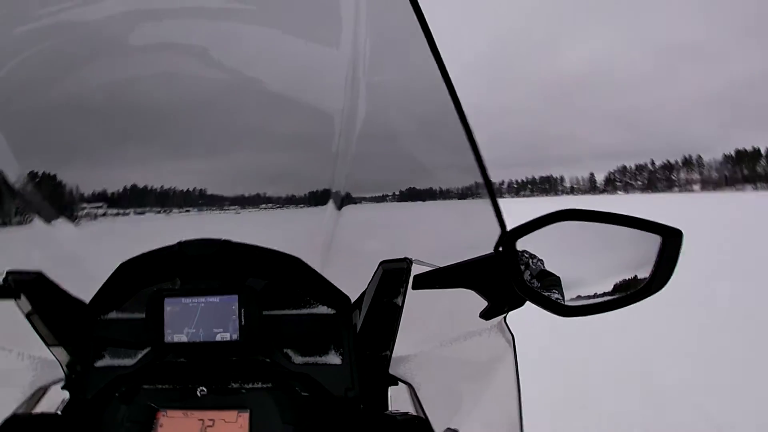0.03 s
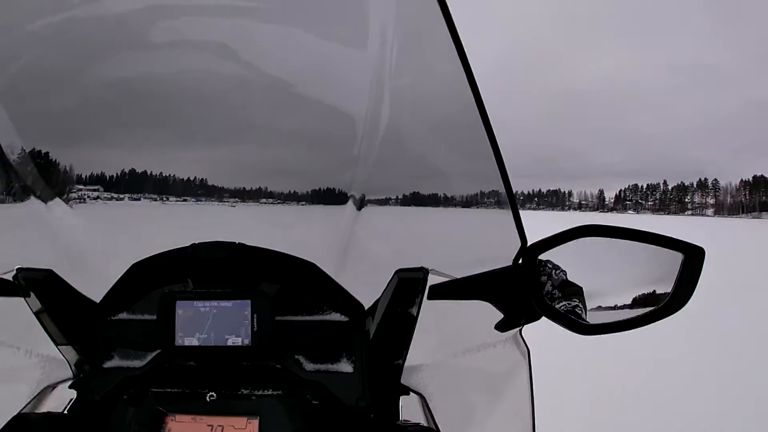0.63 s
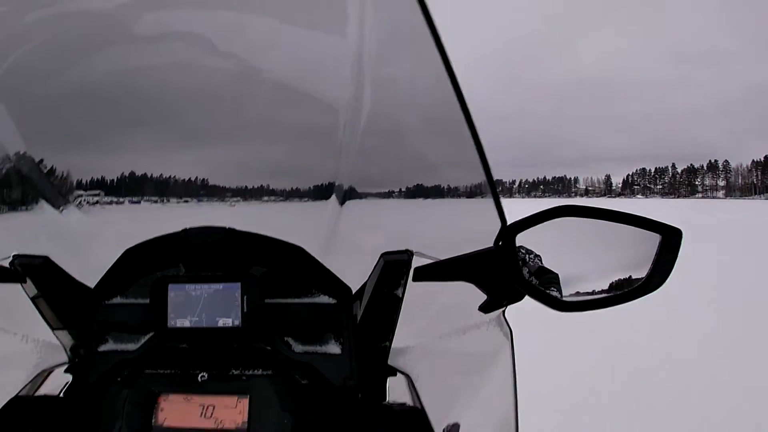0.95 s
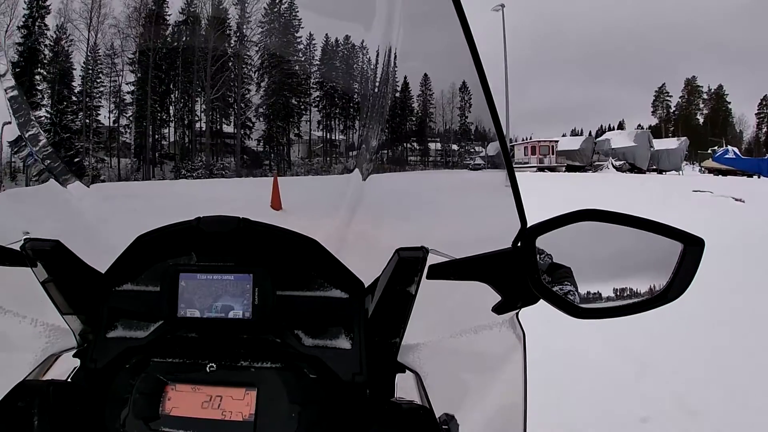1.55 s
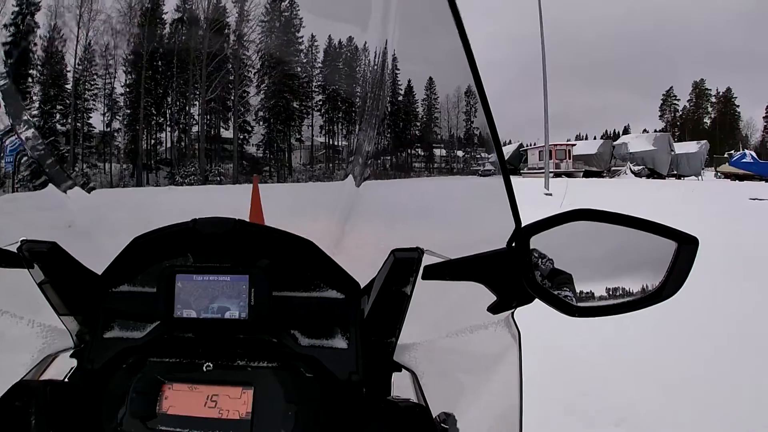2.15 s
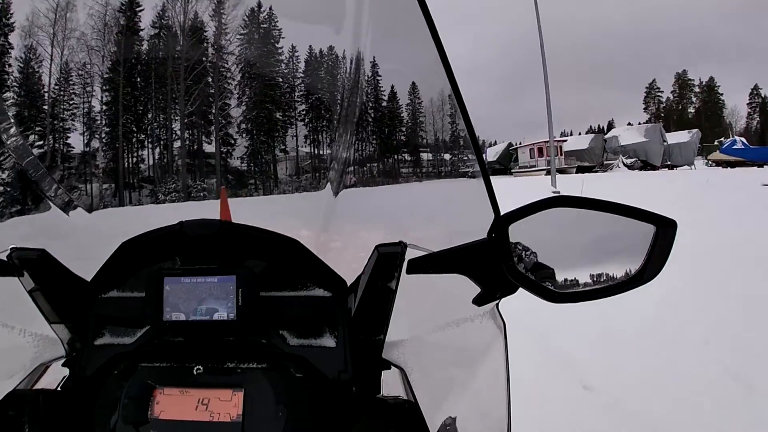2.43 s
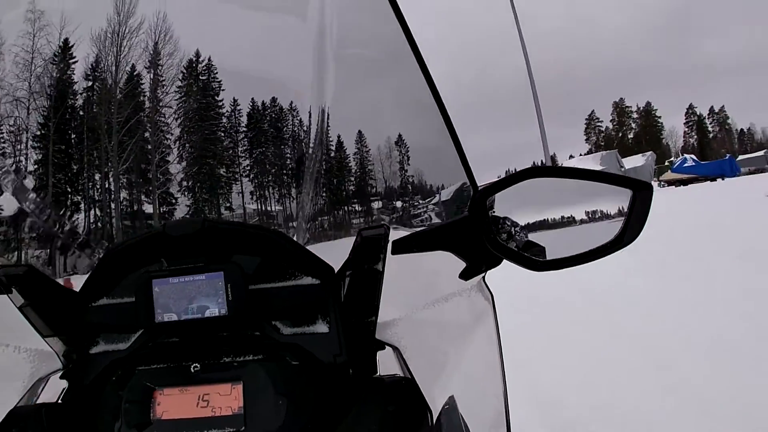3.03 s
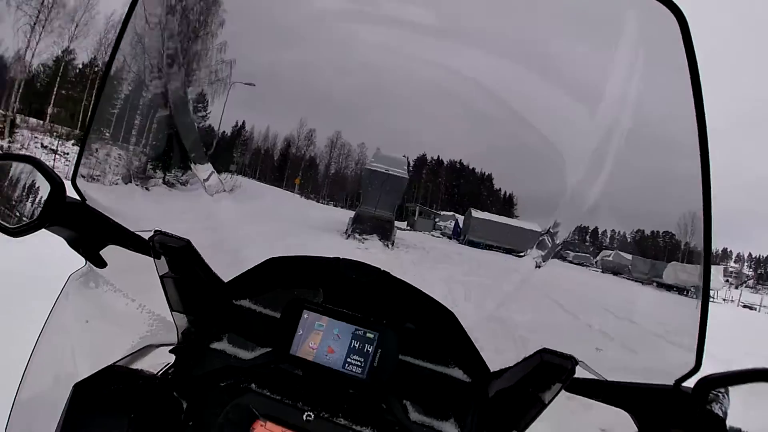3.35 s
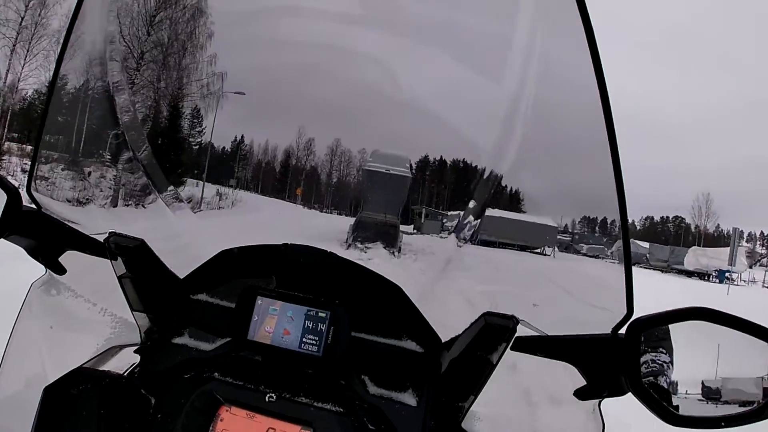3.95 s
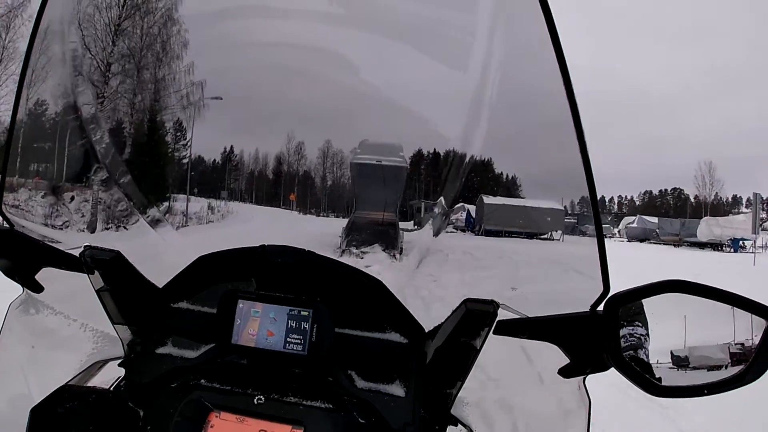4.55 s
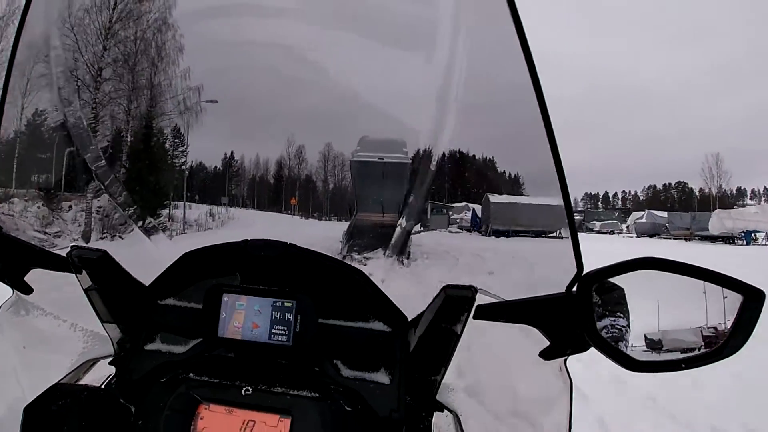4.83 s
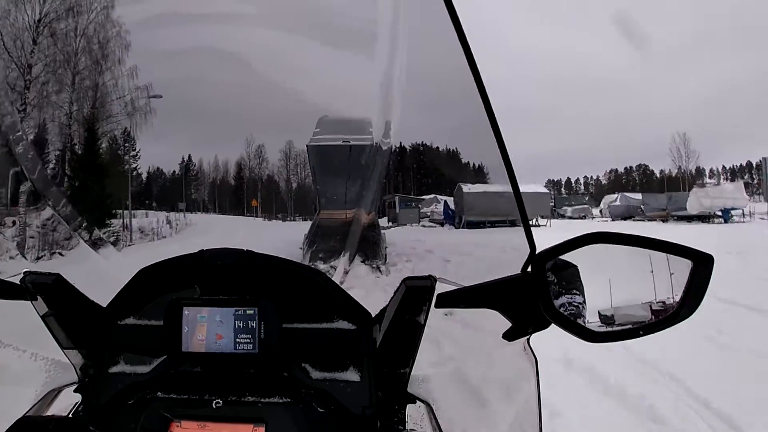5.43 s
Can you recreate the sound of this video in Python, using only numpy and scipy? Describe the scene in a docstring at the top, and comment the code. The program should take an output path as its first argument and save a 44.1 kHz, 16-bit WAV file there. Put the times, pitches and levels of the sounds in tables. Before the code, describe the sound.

Heard from the seat, a snowmobile cruises, accelerates from near idle and chugs slowly along, snow hissing and loose parts ticking.

```python
"""On a frozen lake, from the rider's seat of a four-stroke snowmobile, the microphone in a camera case.
Three rides are joined by hard cuts: cruising, pulling up from near idle, crawling towards the shore.
Close by, the exhaust throbs once per engine cycle, the machinery clatters, and in the second ride
the intake barks and the drive whines. From below, the track drones at cruising speed and snow
hisses and crunches under the skis. Loose parts tick and clink during the crawl."""
import sys
import numpy as np
from scipy import signal
from scipy.fft import rfft, irfft
from scipy.io import wavfile

SR = 44100
rng = np.random.default_rng(int(sys.argv[2]) if len(sys.argv) > 2 else 0)


def put_to_file(sound):
    """Save the sound as 16-bit audio at rate SR, in the file named by the first command-line argument."""
    columns = np.atleast_2d(sound).T  # one column per channel
    safe = np.clip(columns, -1, 1)
    whole_steps = np.round(safe * 32767)
    wavfile.write(sys.argv[1], SR, whole_steps.astype(np.int16))


N = 250927
TIME = np.arange(N) / SR
FREQS = np.maximum(np.fft.rfftfreq(N, 1 / SR), 1)

# Where the second and third rides begin, in seconds.
CUTS_S = [1.108, 3.27]
# Engine speed in each ride. Each row: time in seconds, engine cycles per second.
CRUISE_SPEED = [(0.0, 47.01), (1.11, 45.89)]
PULL_SPEED = [(1.11, 20.29), (1.45, 19.87), (1.95, 20.05), (2.23, 22.25), (2.6, 28.15), (2.83, 29.97),
              (3.27, 29.06)]
CRAWL_SPEED = [(3.27, 23.46), (3.7, 20.87), (3.97, 21.01), (4.31, 22.99), (4.83, 23.72), (5.25, 23.26),
               (5.69, 23.69)]
# Exhaust tones. Each row: multiple of the cycle rate, relative level in dB cruising, pulling, crawling.
EXHAUST_ORDERS = [(1, -34, -46.5, -32.5), (2, -35, -52, -27.5), (3, -40.5, -35, -35), (4, -24, -27, -18),
                  (5, -46, -31, -21.5), (6, -41.5, -41.5, -34.5), (7, -48, -38, -26), (8, -56, -38, -31.5),
                  (9, -62, -48, -40), (10, -63, -51.5, -43), (11, -60, -62, -37.5),
                  (12, -40.5, -56.5, -50.5), (13, -48, -67, -47.5), (14, -41.5, -63, -52),
                  (15, -45, -69, -55)]
# Ringing of engine block and cowling.
# Each row: pitch in Hz, nominal width in Hz, relative level in dB cruising, pulling, crawling.
COWL_RESONANCES = [(300, 60, -50, -50.5, -41.5), (540, 37.4, -44.5, -50, -40.5), (653, 38, -46.5, -43, -53),
                   (701, 50, -47.5, -49, -43.5), (771, 45, -47.5, -60, -51), (854, 120, -42.5, -54, -52.5),
                   (1300, 580, -46, -66, -58.5), (2070, 870, -48.5, -70, -65.5), (3034, 72, -53, -76, -71)]
# Ringing of the airbox under throttle. Each row: pitch in Hz, width in Hz, level in dB.
AIRBOX_RESONANCES = [(468, 40, -45.5), (567, 50, -48.5), (650, 45, -54), (733, 34, -49)]
# Chassis, machinery and snow noise at the seat.
# Each row: frequency in Hz, relative spectral level in dB cruising, pulling, crawling.
RUNNING_SPECTRUM = [(10, -71, -63, -65.5), (25, -62, -58.5, -41), (45.3, -57.5, -51, -50),
                    (87.5, -63, -57, -46), (138, -49.5, -48, -43.5), (220, -54.5, -58, -47),
                    (284.4, -54.5, -60.5, -48.5), (356, -67.5, -69, -59.5), (464, -67.5, -68.5, -63),
                    (636, -56.5, -61.5, -66), (746, -62.5, -71, -65), (1140, -66.5, -73.5, -75),
                    (1690, -69, -77, -76), (2900, -76, -84.5, -83), (4900, -77, -83.5, -81.5),
                    (12000, -76.5, -86.5, -85.5)]
# Bumps in the trail shake the chassis. Each row: time in seconds, rise of the rumble in dB.
TRAIL_BUMPS = [(0.13, 2.5), (1.38, 5), (1.54, 1.5), (2.5, 2), (3.38, 2), (4.5, 2.5)]
# The drive whines as the sled pulls away, joined by a lower tone under load.
# Each row: start in seconds, end in seconds, pitch in Hz, level in dB.
DRIVE_WHINES = [(2.13, 3.27, 1768, -51.5), (2.38, 2.7, 1690, -54), (2.72, 3.14, 1700, -49)]
# The drive belt slips and chirps. Each row: time in seconds, rise of the first whine in dB.
BELT_CHIRPS = [(2.168, 11), (2.301, 14), (2.468, 9), (2.682, 8), (3.205, 7)]
# Ice and crust cracking under the skis. Each row: start in seconds, pitch in Hz, width in Hz,
# time to fade by 60 dB in seconds, peak outside the case in dB.
SKI_CRUNCHES = [(1.167, 1500, 700, 0.036, -29), (1.467, 950, 130, 0.044, -29),
                (1.469, 8300, 2400, 0.031, -18.5), (1.525, 600, 300, 0.028, -27),
                (1.688, 480, 350, 0.047, -29), (1.692, 1030, 250, 0.26, -33),
                (1.752, 1050, 160, 0.077, -30), (2.49, 10200, 1040, .028, -23),
                (2.768, 10500, 1070, 0.026, -17), (3.985, 402, 100, 0.081, -22),
                (4.48, 890, 400, 0.18, -31), (4.526, 696, 100, 0.017, -21), (5.072, 7600, 2400, .11, -26.5),
                (5.104, 6500, 1600, .06, -33), (5.159, 7400, 2200, .08, -27), (5.226, 8000, 2600, .07, -23),
                (5.25, 6400, 2400, .06, -30), (5.293, 7400, 1300, 0.073, -28)]
# The hardest ticks of a small loose part. Each row: time in seconds, strength in dB.
HARD_TICKS = [(3.462, -10), (3.668, -19), (3.714, -16), (4.112, -20), (4.24, -16), (4.509, -15),
              (4.812, -13), (4.885, -20), (4.969, -13), (5.102, -15), (5.228, -14), (5.362, -18.5)]
# Loose metal fittings. Each row: start in seconds, note in Hz, starting level in dB.
FITTING_CLINKS = [(4.262, 3230, -34.5), (4.821, 3280, -34), (5.035, 4100, -38), (5.073, 3580, -34),
                  (5.176, 4040, -35.5), (5.296, 3560, -38)]
# What a fitting rings with. Each row: multiple of its note, relative level in dB.
FITTING_PARTIALS = [(1, 0), (2.02, -3), (3.03, -6)]
# Treble reaching the microphone through the case. Each row: frequency in Hz, gain in dB.
CASE_RESPONSE = [(3000.0, 0.0), (3700.0, -7), (4300.0, -7.5), (5300.0, -5.5), (6100.0, -11), (7000.0, -19),
                 (8200.0, -23.5), (9700.0, -20), (11000.0, -36.5), (14000.0, -34.5), (15500.0, -40.5)]

# Level change in dB per doubling of engine speed, then at full throttle.
ENGINE_RISE_DB, CLATTER_RISE_DB, SNOW_RISE_DB = 1, 8.5, -0.5
LOAD_CLATTER_DB, LOAD_SNOW_DB = -0.4, 3
THROTTLE_OPENS_S = 2.35


def exhaust(rate, cycle, column, span, smear, deep_rise_db, waver_db):
    """The orders add up to one thump per cycle and slide through the silencer as the speed changes."""
    out = np.zeros(len(cycle))
    for k, row in enumerate(EXHAUST_ORDERS, 1):
        lag = smear * (k - 4)   # in turns: orders above the fourth arrive late
        unsteady_db = waver_db * k / len(EXHAUST_ORDERS) * drift(7.6)[span]
        # The two lowest orders swell as the engine pulls harder.
        deep_db = deep_rise_db * np.log2(rate / rate.mean()) * (k <= 2)
        boom = silencer(k * rate) / silencer(k * rate.mean())
        gain = from_db(row[column] + unsteady_db + deep_db) * boom
        out -= np.sqrt(2) * gain * np.cos(2 * np.pi * (k * cycle - lag))
    return out


def silencer(hz, tuned_hz=140, sharpness=2.0):
    """The silencer booms near its tuning and swallows what lies above."""
    return 1 / np.hypot(1 - (hz / tuned_hz) ** 2, hz / tuned_hz / sharpness)


def cowl_rasp(cycle, column, firing_db, tap_count=9):
    """Each firing knocks on block and cowling; valves and pistons tap loosely, hardest near the firing."""
    out = np.zeros(len(cycle))
    force = swell(cycle, depth_db=2.5, lead=0.1)
    for hz, width_hz, *levels_db in COWL_RESONANCES:
        knocks = from_db(firing_db) * impacts(cycle, angle=-0.11, scatter_db=1.5)
        taps = np.zeros(len(cycle))
        for k in range(tap_count):
            sign = rng.choice([-1, 1])
            angle = (k + rng.random()) / tap_count
            taps += sign * impacts(cycle, angle, scatter_db=4.0, jitter_s=0.0004)
        ringing = resonance(knocks + force * taps, hz, 1.34 * width_hz, passes=2)
        out += from_db(levels_db[column - 1]) * ringing / ringing.std()
    return out


def intake(start_turn, lead=0.17, attack_s=0.002, decay_s=0.013, level_db=-41, bite_db=4.5, bite_s=0.26):
    """With the throttle open the engine gulps air once per cycle: the airbox barks, rings and fades."""
    rate = engine_rate(PULL_SPEED)
    cycle = start_turn + turns_of(rate * (TIME >= CUTS_S[0]))
    age = (cycle + lead) % 1 / rate
    envelope = (1 - np.exp(-age / attack_s)) * np.exp(-age / decay_s)
    bark = resonance(envelope * rng.standard_normal(N), hz=535, width_hz=580, passes=3)
    gulp = np.floor(cycle + lead).astype(int)
    gulp_power = np.bincount(gulp, bark ** 2)[gulp] / np.bincount(gulp)[gulp]
    bark /= np.sqrt(gulp_power + 1e-18)   # every gulp is equally strong
    bite = np.exp(-((TIME - THROTTLE_OPENS_S) / bite_s) ** 6)   # harder just after the throttle opens
    out = from_db(level_db + bite_db * bite) * throttle() * bark
    is_open = throttle() > 0
    pulses = impacts(cycle, angle=-lead, scatter_db=3.5)
    for k, (hz, width_hz, db) in enumerate(AIRBOX_RESONANCES):
        ringing = resonance(pulses, hz, width_hz)
        out += (-1) ** k * from_db(db) * is_open * ringing / ringing[is_open].std()
    return out


def throttle(attack_s=0.061, hold_s=0.35, ease_s=0.19, rest=0.26):
    """One squeeze in the second ride, from 0 to 1: it opens, is held, then eases partly back."""
    times = THROTTLE_OPENS_S + np.cumsum([0, attack_s, hold_s, ease_s])
    return np.interp(TIME, times, [0, 1, 1, rest]) * (TIME < CUTS_S[1])


def ride(speed, span, column, start_turn, smear, throb_db, clatter_lead, firing_db, engine_db,
         rumble_db, rumble_rise_db, clatter_db, snow_db, waver_db, deep_rise_db=0):
    """Engine and running noise at the seat: both pulse each cycle and follow speed, throttle and bumps."""
    rate, load = engine_rate(speed)[span], throttle()[span]
    cycle = start_turn + turns_of(rate)
    doublings = np.log2(rate / rate.mean())
    jolt_db = humps(TRAIL_BUMPS, half_s=0.073)[span]
    clatter_change_db = CLATTER_RISE_DB * doublings + LOAD_CLATTER_DB * load + 0.3 * jolt_db
    snow_change_db = SNOW_RISE_DB * doublings + LOAD_SNOW_DB * load
    rumble, clatter, snow = running_noise(column, span)
    engine = exhaust(rate, cycle, column, span, smear, deep_rise_db, waver_db)
    engine *= from_db(engine_db + ENGINE_RISE_DB * doublings)
    engine += from_db(clatter_change_db) * cowl_rasp(cycle, column, firing_db)
    rumble *= from_db(rumble_db + rumble_rise_db * doublings + jolt_db)
    rumble *= swell(cycle, depth_db=0.95, lead=0.46)   # the chassis shakes on between thumps
    clatter *= from_db(clatter_db + clatter_change_db + 0.62 * drift(21)[span])
    clatter *= swell(cycle, throb_db, clatter_lead)
    snow *= from_db(snow_db + snow_change_db + 0.93 * drift(26)[span])
    snow *= swell(cycle, depth_db=0.64, lead=0.055)
    out = np.zeros(N)
    out[span] = engine + rumble + clatter + snow
    return out


def running_noise(column, span, rumble_hz=350, snow_hz=2200):
    """One noise, parted into chassis rumble, machinery clatter and snow hiss."""
    rows = np.array(RUNNING_SPECTRUM)
    colour = from_db(np.interp(np.log(FREQS), np.log(rows[:, 0]), rows[:, column]))
    spectrum = rfft(rng.standard_normal(N)) * np.sqrt(SR / 2) * colour
    low = 1 / (1 + (FREQS / rumble_hz) ** 6)
    high = 1 / (1 + (snow_hz / FREQS) ** 3)
    return [irfft(spectrum * share, N)[span] for share in (low, 1 - low - high, high)]


def track_drone(lug_hz=246.5, sag_hz_per_s=9.6, level_db=-26, waver_db=1.2):
    """Under the seat, track lugs slap past the drive wheel as the cruising sled slowly loses speed."""
    angle = 2 * np.pi * turns_of(lug_hz - sag_hz_per_s * TIME)
    return from_db(level_db + waver_db * drift(11.0)) * np.sqrt(2) * np.sin(angle)


def drive_whine(jitter_hz=18, attack_s=0.04, squeal_hz=7570, squeal_db=-49):
    """Rough tones from the drive; the first chirps as the belt takes hold and squeals under load."""
    chirp_db = humps(BELT_CHIRPS, half_s=0.011)
    out = np.zeros(N)
    for k, (start, end, hz, db) in enumerate(DRIVE_WHINES):
        angle = 2 * np.pi * turns_of(hz + jitter_hz * drift(70))
        tones = from_db(db + chirp_db * (k == 0)) * np.sin(angle)
        tones += 0.3 * from_db(db) * np.sin(3 * angle)
        if k == 0:
            tones += from_db(squeal_db) * np.sqrt(throttle()) * np.sin(squeal_hz / hz * angle)
        envelope = np.clip(np.minimum(TIME - start, 10 * (end - TIME)) / attack_s, 0, 1)
        flutter = 1 + 0.35 * drift(70)
        out += envelope * flutter * tones
    return out


def ski_crunches():
    """Ice and crust crack under the skis, each crack a burst of grains around one pitch."""
    out, age = np.zeros(N), TIME[:SR // 10]
    for s, hz, width_hz, t60, peak_db in SKI_CRUNCHES:
        grains = rng.standard_normal(len(age))
        burst = resonance(grains * np.abs(grains) * from_db(-60 * age / t60), hz, width_hz)
        at = round(s * SR)
        out[at:at + len(age)] += from_db(peak_db) * burst / np.abs(burst).max()
    return out


def loose_ticks(shake, faint_db=-29, ring_hz=10050, ring_s=0.00097, ring_db=-13):
    """A loose part snaps and rings: faintly when a thump shakes it enough, now and then more sharply."""
    shaken = np.diff((shake < -0.18).astype(float), prepend=0) > 0
    kicks = shaken * from_db(faint_db + rng.standard_normal(N))
    for s, db in HARD_TICKS:
        kicks[round(s * SR)] = from_db(db)
    age = TIME[:SR // 100]
    snap = resonance(signal.unit_impulse(len(age)), hz=11800, width_hz=3600, passes=2)
    ring = from_db(ring_db) * np.exp(-age / ring_s) * np.sin(2 * np.pi * ring_hz * age)
    return np.convolve(kicks, snap / np.abs(snap).max() + ring)[:N]


def fitting_clinks(t60=0.04, jitter_hz=70):
    """A shaken fitting scrapes and rings briefly on one unsteady note and its overtones."""
    out, age = np.zeros(N), TIME[:SR // 10]
    waver_hz = jitter_hz * drift(130)
    for s, hz, start_db in FITTING_CLINKS:
        span = slice(round(s * SR), round(s * SR) + len(age))
        angle = 2 * np.pi * turns_of(hz + waver_hz[span])
        ringing = sum(from_db(db) * np.sin(multiple * angle) for multiple, db in FITTING_PARTIALS)
        out[span] += from_db(start_db - 60 * age / t60) * ringing
    return out


def engine_rate(speed):
    """Engine cycles per second, at every sample."""
    return np.interp(TIME, *np.transpose(speed))


def impacts(cycle, angle, scatter_db, jitter_s=0):
    """One click per engine cycle at an angle in turns, scattered in strength and optionally in time."""
    at = np.flatnonzero(np.diff(np.floor(cycle - angle)))
    strength, late = rng.standard_normal((200, 2))[:len(at)].T
    at += np.round(late * jitter_s * SR).astype(int)
    clicks = np.zeros(len(cycle))
    clicks[np.clip(at, 0, len(cycle) - 1)] = from_db(scatter_db * strength)
    return clicks


def resonance(x, hz, width_hz, passes=1):
    """One ringing mode; each further pass narrows it."""
    for _ in range(passes):
        x = signal.lfilter(*signal.iirpeak(hz, hz / width_hz, fs=SR), x + 1e-18)
    return x


def swell(cycle, depth_db, lead):
    """A rise and fall of level once per engine cycle, of mean power 1."""
    gain = from_db(depth_db * np.cos(2 * np.pi * (cycle + lead)))
    return gain / np.sqrt(np.mean(gain ** 2))


def humps(rows, half_s):
    """A smooth rise and fall for each pair of time in seconds and height."""
    return sum(height * np.exp(-((TIME - s) / half_s) ** 2) for s, height in rows)


def drift(hz, step=40):
    """A slow random wander of spread 1, mostly below the given frequency."""
    pole = np.exp(-2 * np.pi * step * hz / SR)
    noise = rng.standard_normal(N // step + 2002)
    slow = signal.lfilter([1], [1, -2 * pole, pole * pole], noise)[2000:]
    return np.interp(np.arange(N) / step, np.arange(len(slow)), slow / slow.std())


def turns_of(hz):
    """Turns made since the start."""
    return np.cumsum(hz) / SR


def from_db(db):
    """Decibels as a gain."""
    return 10 ** (np.asarray(db) / 20)


def scene():
    """The three rides one after another, in mono from the rider's seat."""
    first, second = [round(s * SR) for s in CUTS_S]
    pull_turn = 0.36   # point in the engine cycle as the second ride begins
    cruise = ride(CRUISE_SPEED, slice(0, first), column=1, start_turn=0.394, smear=0.119,
                  throb_db=-1.3, clatter_lead=0.054, firing_db=3.5, engine_db=-0.33, waver_db=2.5,
                  rumble_db=2.5, rumble_rise_db=6.0, clatter_db=-1.0, snow_db=-1.44)
    pull = ride(PULL_SPEED, slice(first, second), column=2, start_turn=pull_turn, smear=0.078,
                throb_db=0.8, clatter_lead=0.06, firing_db=8.5, engine_db=-1.0, waver_db=4.5,
                rumble_db=-1.0, rumble_rise_db=5.5, clatter_db=-4.0, snow_db=2.05, deep_rise_db=18)
    crawl = ride(CRAWL_SPEED, slice(second, N), column=3, start_turn=0.218, smear=0.044,
                 throb_db=0.5, clatter_lead=0.02, firing_db=9.0, engine_db=-1.53, waver_db=3.0,
                 rumble_db=-1.3, rumble_rise_db=19.0, clatter_db=0.0, snow_db=1.1)
    sled = cruise + track_drone() * (TIME < CUTS_S[0]) + pull + intake(pull_turn) + crawl + drive_whine()
    details = loose_ticks(crawl) + fitting_clinks() + ski_crunches()
    dips = 1 - humps([(s, 1) for s in CUTS_S], half_s=0.0031)   # an instant's dip at each cut
    return (dips * (sled + details))[None]


def record(dry, cutoff_hz=15500):
    """The camera's case muffles the treble on its way to the microphone; the top is cut."""
    padded = np.pad(dry, [(0, 0), (0, N)])
    hz, gain_db = np.transpose(CASE_RESPONSE)
    case = from_db(np.interp(np.fft.rfftfreq(2 * N, 1 / SR), hz, gain_db))
    muffled = irfft(rfft(padded) * case)[:, :N]
    return signal.sosfilt(signal.cheby2(12, 70, cutoff_hz, fs=SR, output="sos"), muffled)


dry = scene()
out = record(dry)
put_to_file(out)
```